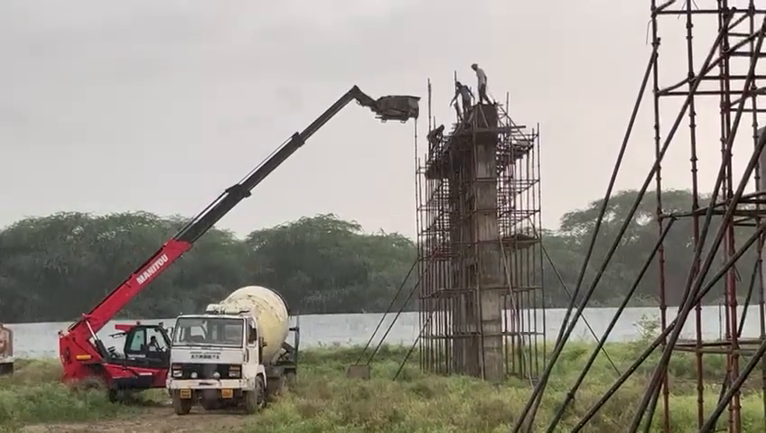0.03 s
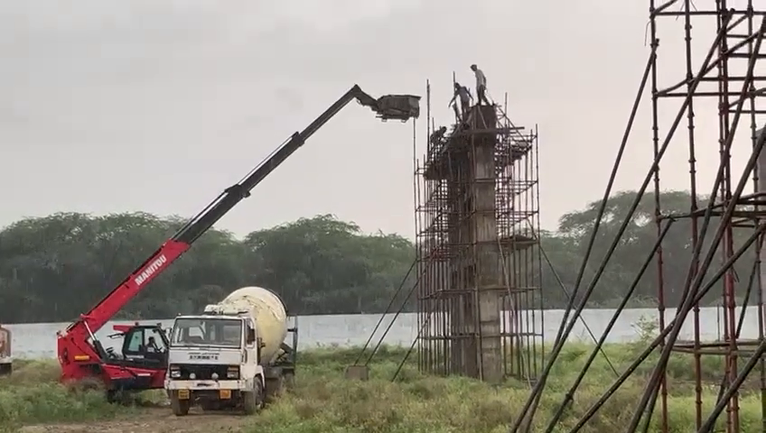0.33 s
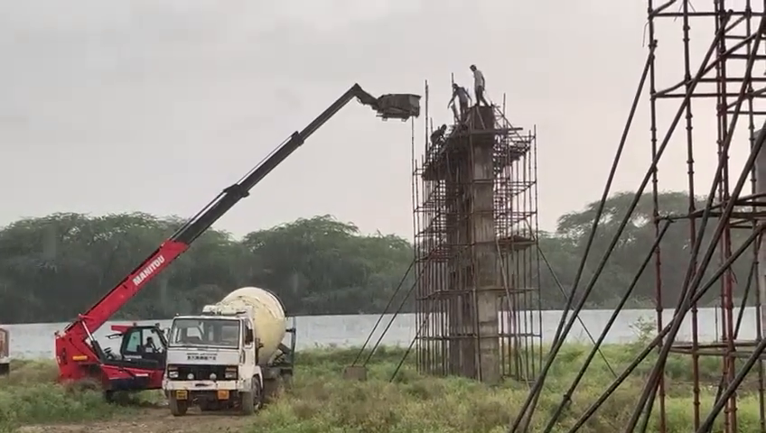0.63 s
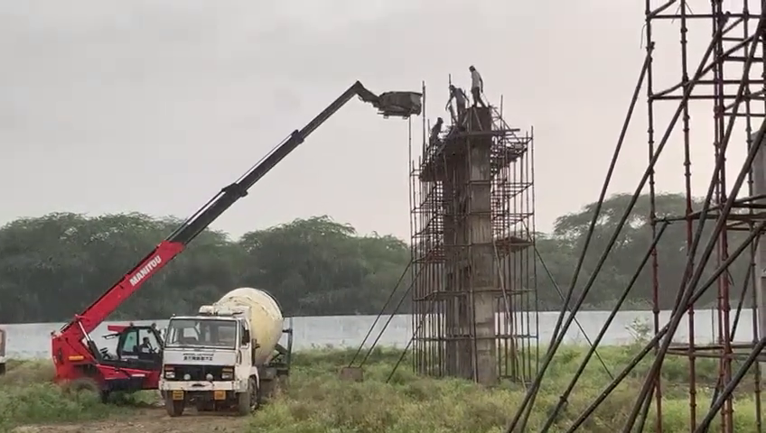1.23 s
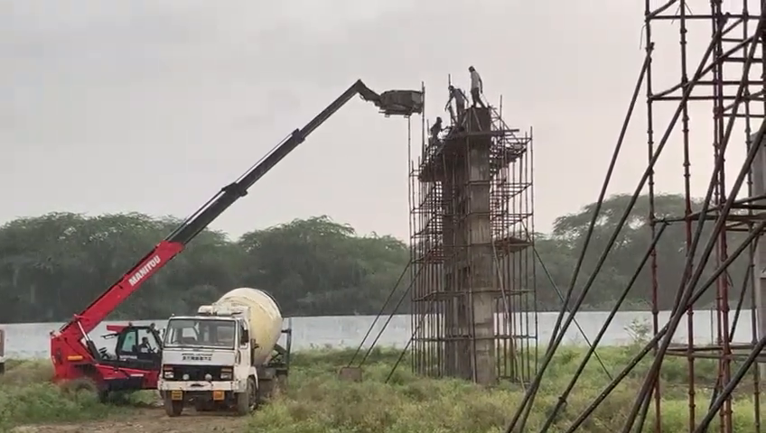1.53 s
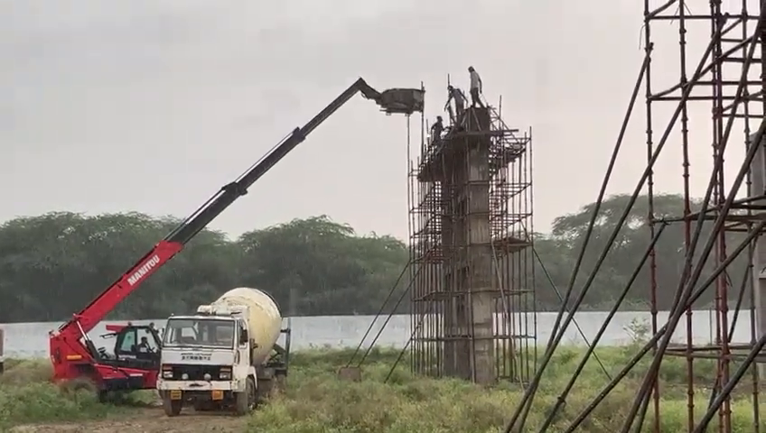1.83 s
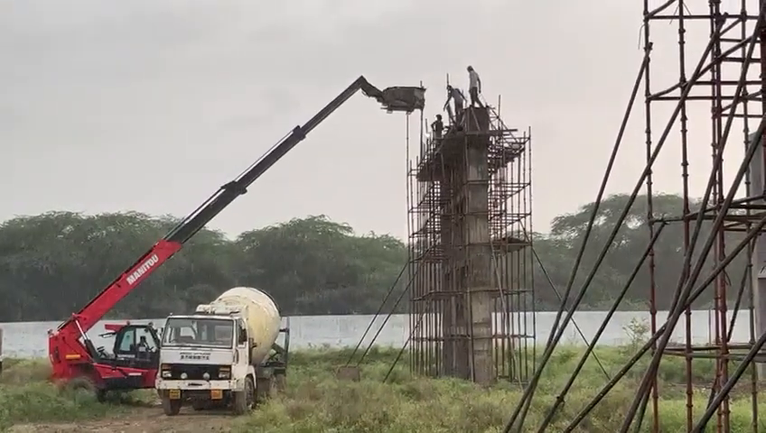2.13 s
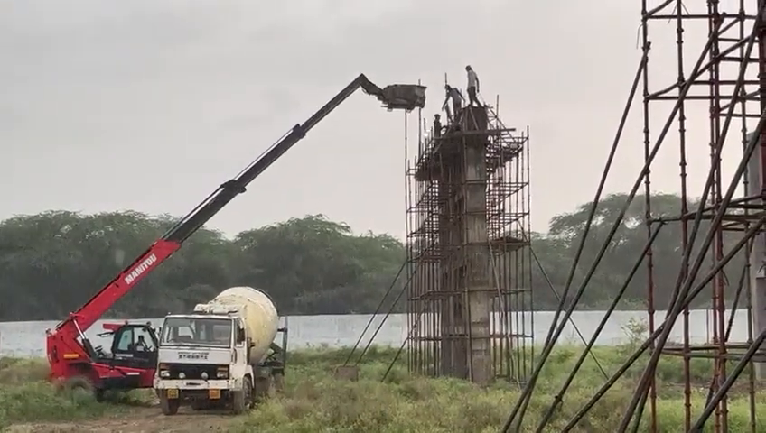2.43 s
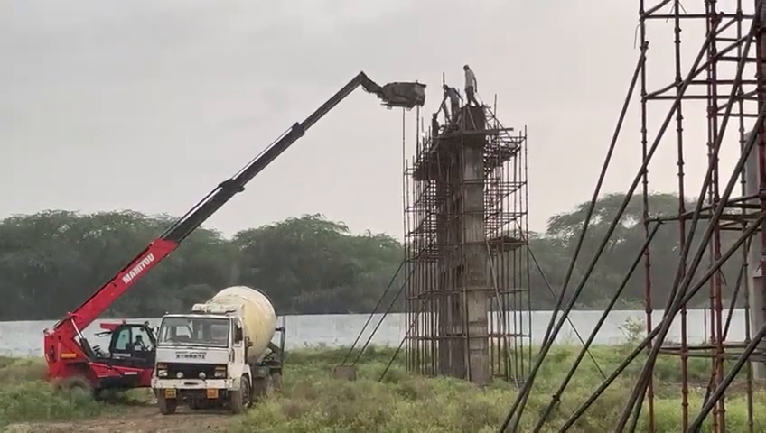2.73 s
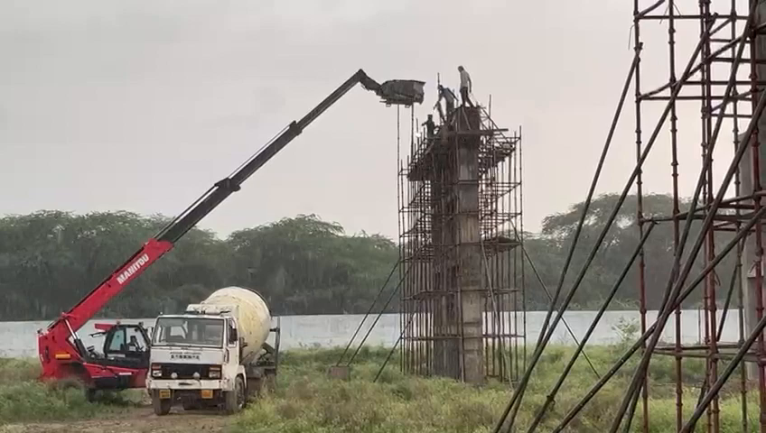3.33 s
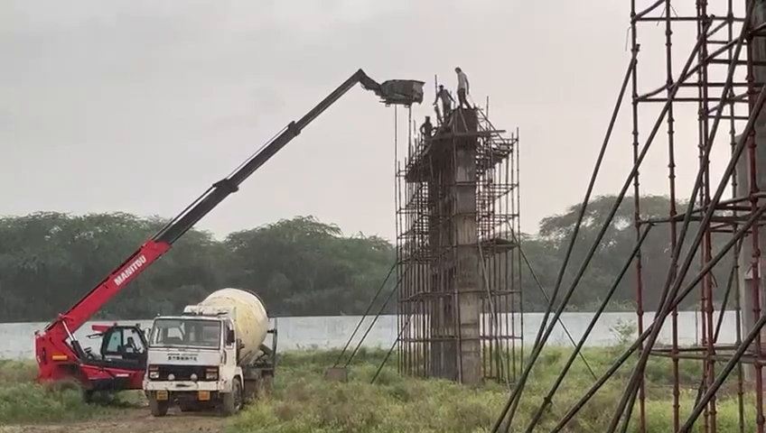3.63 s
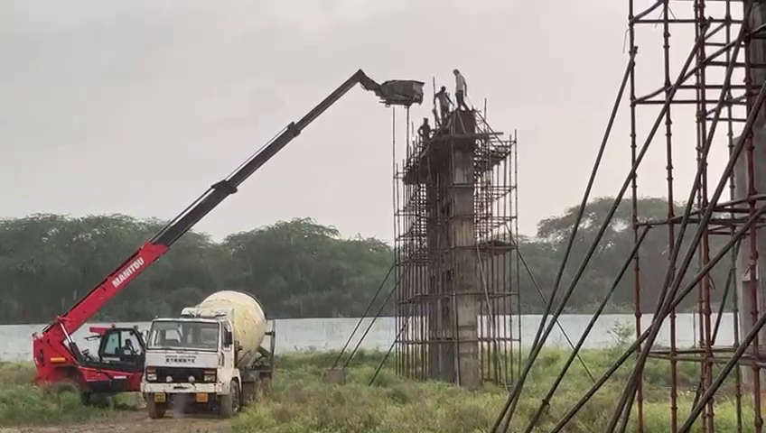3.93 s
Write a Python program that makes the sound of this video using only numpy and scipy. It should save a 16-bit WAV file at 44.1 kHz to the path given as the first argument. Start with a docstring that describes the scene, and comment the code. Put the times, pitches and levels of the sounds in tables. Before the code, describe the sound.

A telehandler's diesel engine drones throughout on a building site, beating against an idling mixer truck with rumble, clatter, fan rush and faint whines. Around 0.4 seconds scaffolding ticks and a wavering hum, probably a concrete vibrator, swells and sags. A tick and a dull knock follow just after 1 second. The hum returns from 1.5 seconds and after 3, with three faint ticks between 2.3 and 2.9.

```python
"""From the start a telehandler's four-cylinder diesel drones steadily on a building site, beating against
an idling mixer truck amid rumble, injection clatter, fan rush, pump and gear tones and a faint moan.
Within half a second the scaffold ticks and a wavering hum, probably a concrete vibrator, swells and sags.
Just after 1 s come another tick and a dull knock on a board. The hum swells again from 1.5 s,
three faint ticks fall between 2.3 and 2.9 s, and the hum surges once more after 3 s."""
import sys
import numpy as np
from scipy import signal
from scipy.fft import rfft, irfft
from scipy.io import wavfile
from scipy.ndimage import map_coordinates

SR = 44100
rng = np.random.default_rng(int(sys.argv[2]) if len(sys.argv) > 2 else 0)


def pcm_store(signal):
    """Save signal as 16-bit PCM."""
    levels = np.round(np.clip(np.atleast_2d(signal), -1, 1) * 32767)
    wavfile.write(sys.argv[1], SR, levels.astype(np.int16).T)


N = 176400
T = np.arange(N) / SR
BIN_HZ = np.arange(N // 2 + 1) * SR / N


def undb(db):
    """Amplitude ratio: tenfold for every 20 dB."""
    return 10 ** (np.asarray(db) / 20)


def level(x, db):
    """Normalisation to an rms level."""
    return x * undb(db) / np.sqrt(np.mean(x ** 2))


def curve(points):
    """Frequency response in dB: (f/Hz, level/dB) points interpolated on a log axis."""
    hz, db = np.array(points, float).T
    return np.interp(np.log(np.maximum(BIN_HZ, 1)), np.log(hz), db)


def colour(x, points):
    """Linear filtering: the spectrum is multiplied by a frequency response."""
    return irfft(rfft(x) * undb(curve(points)), N)


def walk(rate):
    """Low-pass noise of unit variance, making about rate moves a second."""
    wander = irfft(rfft(rng.standard_normal(N)) * np.exp(-(2 * BIN_HZ / rate) ** 2), N)
    return (wander - wander.mean()) / wander.std()


def lean(left, right):
    """Interaural level difference: each band favours the ear nearer to its source."""
    # off-centre machines (f/Hz, left minus right level/dB)
    balance = [(100, -.3), (310, -.4), (400, -5), (520, -2.5), (680, -3), (900, -4), (1070, -3), (1250, 2),
               (2200, 3), (3500, 0), (10000, 0)]
    gain = undb(curve(balance) / 2)
    return np.array([irfft(rfft(left) * gain, N), irfft(rfft(right) / gain, N)])


def spread(mid, side):
    """Mid-side stereo processing: left and right differ band by band, nearly opposite in two treble bands."""
    # stereo width (f/Hz, side minus mid level/dB)
    width = [(30, -20), (80, -21.5), (170, -17), (350, -4), (550, -9), (730, -1), (900, -10.5),
             (1130, -1.5), (1300, -7.5), (1600, 0.5), (2300, -8.5), (2600, -3.5), (3400, -21), (5000, -67),
             (5350, 15.5), (6000, 6.5), (6800, 49), (7350, 23.5), (7800, -34), (10000, -17), (11000, 4),
             (11500, 39)]
    ratio = undb(curve(width))
    mid = irfft(rfft(mid) / np.hypot(1, ratio), N)
    side = irfft(rfft(side) * ratio / np.hypot(1, ratio), N)
    return lean(mid + side, mid - side)


def fans(sway_db=.2, flicker_db=.63):
    """Broadband flow noise: radiator fans rush, swaying a little on the breeze."""
    # cooling fans and open air (f/Hz, relative spectral level/dB)
    spectrum = [(25, -38), (100, -5), (300, 5.5), (600, 0.5), (1000, -6), (2000, -10), (3300, -11.5),
                (5000, -14.5), (6000, -26), (7800, -22.5), (10000, -22), (11500, -29)]
    rush = spread(*colour(rng.standard_normal((2, N)), spectrum))
    return level(rush, db=-45) * undb(sway_db * walk(3) + flicker_db * walk(26))


def rumble():
    """Forced vibration: uneven combustion booms in the silencers and body panels."""
    # boom of both engines (f/Hz, relative spectral level/dB)
    spectrum = [(10, -51), (22, -16), (33, -10), (42, -17), (56, -2), (68, 4.5), (80, 1), (100, -4),
                (120, -1), (138, -7), (168, -10), (184, 1.5), (215, -8), (255, -4.5), (300, -15.5),
                (420, -33), (900, -84)]
    return level(spread(*colour(rng.standard_normal((2, N)), spectrum)), db=-36)


def ticks(decay_s=.006):
    """Impact transients: tiny scaffold contacts give bright, exponentially damped noise."""
    # contacts (t/s, level/dB, centre f/Hz)
    contacts = [(.27, -55, 9000), (0.396, -39, 4700), (0.461, -52, 7900), (1.085, -53, 9000),
                (2.324, -52, 10300), (2.812, -52, 9600), (2.876, -51, 9200)]
    out = 0
    for start, db, hz in contacts:
        band = colour(rng.standard_normal((2, N)), [(hz / 2, -25), (hz, 0), (hz * 2, -25)])
        out = out + level(band, db) * (T >= start) * np.exp(-np.abs(T - start) / decay_s)
    return spread(*out)


def knock(rise_s=.003):
    """Free vibration: a softly bumped formwork board rings in damped modes."""
    # bumps (t/s, level/dB)
    bumps = [(1.131, -33.5)]
    # board modes (f/Hz, relative level/dB, decay time/s)
    modes = [(858, 0, .022), (1070, -8, .018), (1255, -7, .022)]
    out = 0
    for start, db in bumps:
        age = np.maximum(T - start, 0)
        ring = sum(undb(mode_db) * np.sin(2 * np.pi * hz * age) * np.exp(-age / decay_s)
                   for hz, mode_db, decay_s in modes)
        out = out + undb(db) * ring * (1 - np.exp(-age / rise_s))
    return lean(out, out)


def moan(jitter=.016, flutter_db=2):
    """Frequency modulation: a thin tone, probably hydraulic, comes and goes around 620 Hz."""
    # course of the moan (t/s, f/Hz, level/dB)
    course = [(.05, 650, -60), (.15, 650, -44.5), (.25, 625, -58), (.36, 620, -51), (.45, 640, -46),
              (.56, 645, -66), (1, 620, -54), (1.18, 640, -51), (1.23, 654, -45), (1.27, 632, -44),
              (1.33, 612, -53), (1.42, 618, -46), (1.49, 625, -43.5), (1.53, 645, -47), (1.6, 620, -64),
              (1.8, 592, -46), (1.9, 605, -55), (2, 642, -48), (2.12, 598, -49), (2.25, 610, -66),
              (2.54, 645, -49), (2.75, 620, -70), (3.3, 605, -60), (3.5, 592, -47), (3.62, 600, -60),
              (4, 619, -56)]
    times, hz, db = np.array(course).T
    phase = 2 * np.pi * np.cumsum(np.interp(T, times, hz) * (1 + jitter * walk(84))) / SR
    tone = np.sqrt(2) * np.sin(phase) * undb(np.interp(T, times, db) + flutter_db * walk(25))
    return lean(tone, tone)


def thin_tone(hz, envelope, waver_hz, flutter_db, rate):
    """Line broadening: random modulation of pitch and level roughens a sine that follows an envelope."""
    phase = 2 * np.pi * np.cumsum(hz + waver_hz * walk(rate)) / SR
    db = np.interp(T, *np.array(envelope).T) + flutter_db * walk(rate)
    tone = np.sqrt(2) * np.sin(phase) * undb(db)
    return lean(tone, tone)


def gear_ring(hz=1290, half_width_hz=28):
    """Resonance: noise in a narrow band gives a wavering ring that swells and fades."""
    # envelope of the ring (t/s, level/dB)
    envelope = [(0, -69), (.6, -48), (1.05, -59), (1.4, -52.5), (2.1, -57), (2.6, -49), (3.5, -49.5),
                (4, -53)]
    ring = irfft(rfft(rng.standard_normal((2, N))) / (1 + ((BIN_HZ - hz) / half_width_hz) ** 2), N)
    return level(spread(*ring), 0) * undb(np.interp(T, *np.array(envelope).T))


def gear_whine():
    """Roughness: two close gear tones beat rapidly as they swell and fade together."""
    # envelope of the whine (t/s, level/dB)
    envelope = [(0, -64), (.26, -65), (.3, -52), (.37, -51.5), (.48, -56), (.7, -63), (1.2, -64),
                (1.37, -58), (1.6, -65), (2.25, -57), (2.8, -62), (3.1, -58), (3.8, -63), (3.9, -54),
                (4, -61)]
    lower = thin_tone(1908, envelope, waver_hz=12, flutter_db=3, rate=110)
    upper = thin_tone(1955, envelope, waver_hz=22, flutter_db=3.5, rate=110)
    return lower + undb(-4) * upper


def turns(hz, wobble=.0016):
    """Phase as the integral of frequency: the cycle count of a governed machine that hunts slightly."""
    return np.cumsum(hz * (1 + wobble * walk(2.95))) / SR + rng.random()


def drone(cycles, orders, flutter_db, flutter_rate):
    """Superposition: tones at multiples of a machine's rate, each fluttering on its way through the air."""
    out = 0
    for multiple, db in orders:
        tone = np.sin(2 * np.pi * (multiple * cycles + rng.random()))
        flutter = undb(flutter_db * np.log(1 + multiple) * walk(flutter_rate))
        out = out + level(tone * flutter, db)
    return lean(out, out)


def pump_drone(hz):
    """Periodic excitation: the hydraulic pump hums at multiples of its rate."""
    # pump tones (multiple of the rate, level/dB)
    orders = [(1, -43.5), (2.5, -55)]
    return drone(turns(hz), orders, flutter_db=3.5, flutter_rate=15)


def pump_whistle(pump_hz):
    """Amplitude modulation: the pump's fifth harmonic swells and fades."""
    # envelope of the whistle (t/s, level/dB)
    envelope = [(0, -60), (.35, -50), (.55, -55), (.72, -49), (.96, -46.5), (1.1, -54), (1.25, -48),
                (1.4, -58), (2.25, -58), (2.42, -50), (2.6, -59), (4, -55)]
    return thin_tone(5 * pump_hz, envelope, waver_hz=2.5, flutter_db=1.5, rate=25)


def vibrator(jitter=.025, flutter_db=1.4):
    """Rotating unbalance: a weight hums, slows as concrete loads it and interferes with its echoes."""
    # course of the fundamental (t/s, f/Hz, level/dB)
    course = [(0, 205, -42), (.22, 212, -52), (.38, 219, -33.5), (.59, 219, -33.5), (.65, 200, -36),
              (.78, 203, -40.5), (1.05, 205, -54), (1.4, 212, -47), (1.5, 217, -35), (1.57, 219, -33),
              (1.66, 197, -34.5), (1.8, 208, -47), (1.92, 215, -37.5), (2.03, 200, -37), (2.15, 203, -39),
              (2.24, 198, -53), (2.55, 203, -45), (2.66, 202, -37.5), (2.8, 210, -45), (2.98, 212, -43),
              (3.07, 217, -34.5), (3.2, 220, -38), (3.3, 218, -37), (3.38, 199, -37.5), (3.5, 204, -53),
              (4, 203, -46)]
    # far reflections across the site (delay/s, relative level/dB)
    echoes = [(.085, -13), (.16, -12)]
    times, hz, db = np.array(course).T
    phase = 2 * np.pi * np.cumsum(np.interp(T, times, hz) * (1 + jitter * walk(40.5))) / SR
    harmonics = np.sin(phase) + undb(-17) * np.sin(2 * phase) + undb(-20) * np.sin(3 * phase)
    hum = np.sqrt(2) * harmonics * undb(np.interp(T, times, db) + flutter_db * walk(45))
    return hum + sum(undb(echo_db) * np.interp(T - delay, T, hum, left=0) for delay, echo_db in echoes)


def clatter(firings, firing_hz, repeat_share=.5, knock_depth=.24, decay_firings=.82):
    """Cyclostationary noise: valve and injector rattle partly recurs every four firings, pulsing at each."""
    # response of engine block and panels (f/Hz, relative level/dB)
    response = [(30, -40), (150, 4), (300, -2.5), (380, 1), (530, -2), (640, 2), (735, -5.5), (850, -1.5),
                (1000, -2.5), (1150, -3), (1290, -3.5), (1420, -6.5), (1700, -8), (1920, -8.5), (2100, -9),
                (2380, -8), (2700, -12.5), (3500, -22), (5000, -24), (11000, -35.5)]
    cycle_samples = int(4 * SR / firing_hz)
    position = (firings / 4 % 1) * cycle_samples
    repeating = map_coordinates(rng.standard_normal(cycle_samples), [position], order=3, mode="grid-wrap")
    rattle = np.sqrt(repeat_share) * repeating + np.sqrt(1 - repeat_share) * rng.standard_normal(N)
    alternation = 1 + .057 * np.cos(np.pi * np.floor(firings))
    pulses = 1 + knock_depth * np.exp(-(firings % 1) / decay_firings) * alternation
    return colour(pulses * rattle, response)


def injectors(firings, decay_firings=.4, scatter_db=2.5):
    """Impulsive excitation: each firing snaps an injector, a rasp of random size, alternately accented."""
    # injector rasp (f/Hz, relative spectral level/dB)
    spectrum = [(1400, -30), (1900, 7.5), (2150, -3), (2420, -3.5), (2700, -4.5), (3300, -16),
                (5000, -15.5), (9000, -45)]
    index = np.floor(firings).astype(int)
    alternation = 1 + .16 * np.cos(np.pi * index)
    strength = undb(scatter_db * rng.standard_normal(index.max() + 1))[index] * alternation
    bursts = strength * np.exp(-(firings % 1) / decay_firings) * rng.standard_normal((2, N))
    return level(spread(*colour(bursts, spectrum)), db=-52.5)


def diesel(firings, firing_hz, orders, block_db, flutter_db, throb_db=1.2):
    """Phase locking: one crankshaft times both the throbbing exhaust notes and the block clatter."""
    block = spread(clatter(firings, firing_hz), clatter(firings, firing_hz))
    exhaust = drone(firings, orders, flutter_db, flutter_rate=23) * undb(throb_db * walk(24))
    return exhaust + level(block, block_db)


def mixer_truck(firing_hz=43.45):
    """Beating: the idling truck's exhaust notes lie a few hertz from the telehandler's."""
    # exhaust tones (multiple of the firing rate, level/dB)
    orders = [(1, -45.5), (2, -43), (2.5, -47.5), (5, -53)]
    return diesel(turns(firing_hz), firing_hz, orders, block_db=-43, flutter_db=.5)


def telehandler(firing_hz=50.8):
    """Periodic combustion: four cylinders fire in turn, setting the pitch of the drone and the rasp's pace."""
    # exhaust and gear tones (multiple of the firing rate, level/dB)
    orders = [(1, -34), (2, -37.5), (3, -53), (4, -54), (5, -46.5), (8, -54), (10, -55.5), (10.75, -63),
              (11.75, -60), (18.75, -60), (24.75, -61), (25.25, -62), (25.75, -61), (27, -63)]
    firings = turns(firing_hz)
    return diesel(firings, firing_hz, orders, block_db=-40.5, flutter_db=.74) + injectors(firings)


def scene(pump_hz=114.6):
    """Superposition: the pressures of the engines, the hydraulics and the concrete work add."""
    machines = telehandler() + mixer_truck() + pump_drone(pump_hz)
    thin_tones = gear_ring() + moan() + pump_whistle(pump_hz) + gear_whine()
    return machines + thin_tones + rumble() + fans() + vibrator() + ticks() + knock()


def record(dry):
    """Band limiting: a steep elliptic low-pass cuts the treble above 11.7 kHz."""
    return signal.sosfilt(signal.ellip(8, .2, 80, 11700, fs=SR, output="sos"), dry)


dry = scene()
out = record(dry)
pcm_store(out)
```